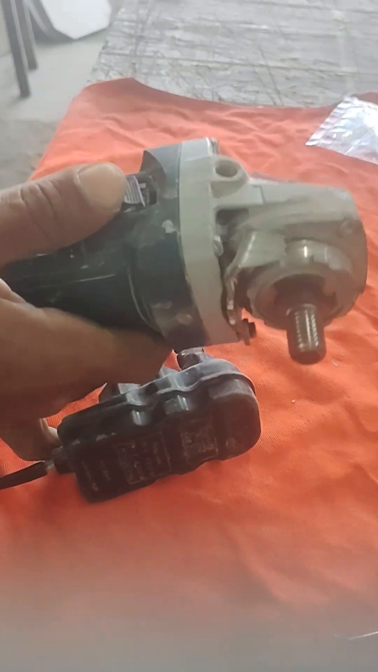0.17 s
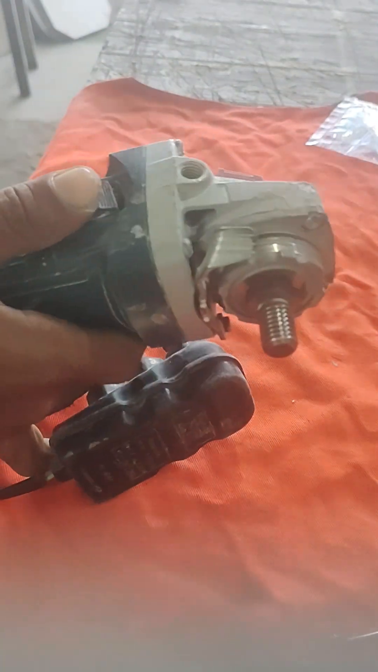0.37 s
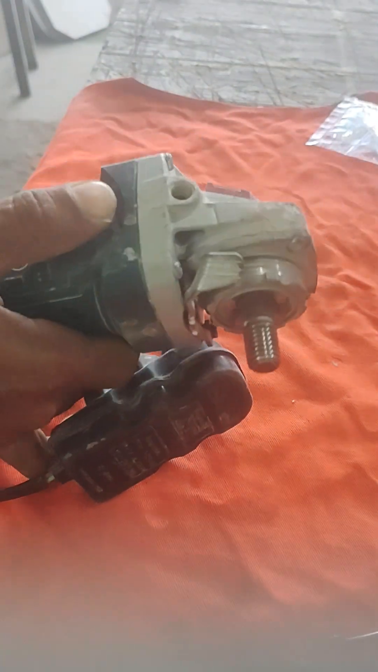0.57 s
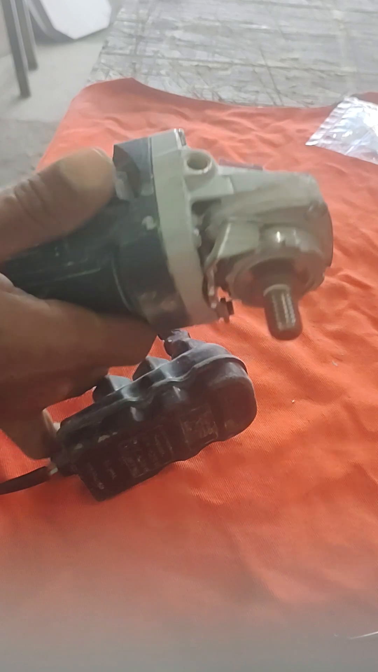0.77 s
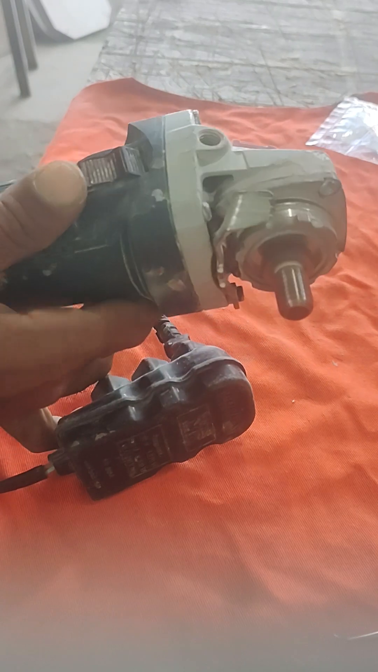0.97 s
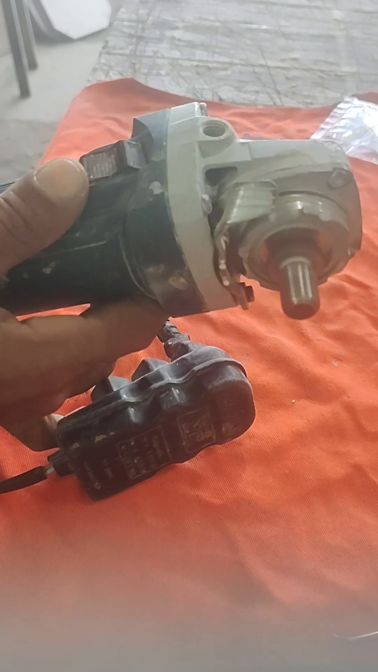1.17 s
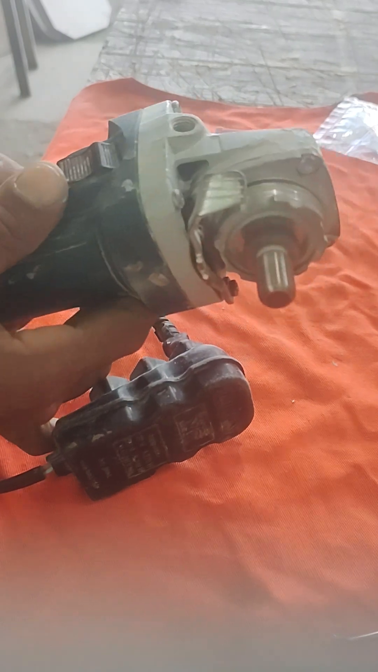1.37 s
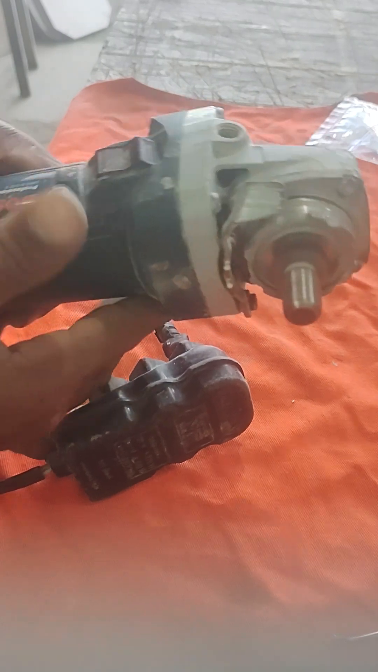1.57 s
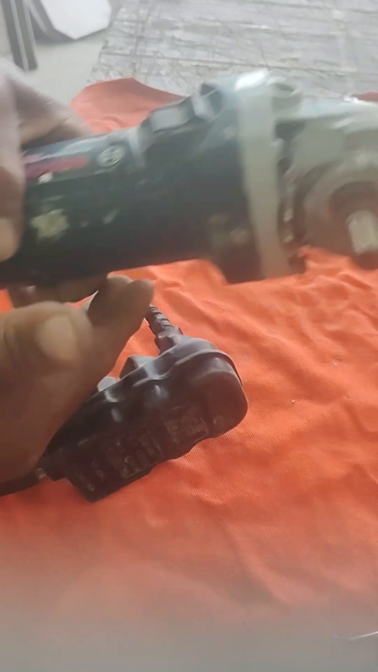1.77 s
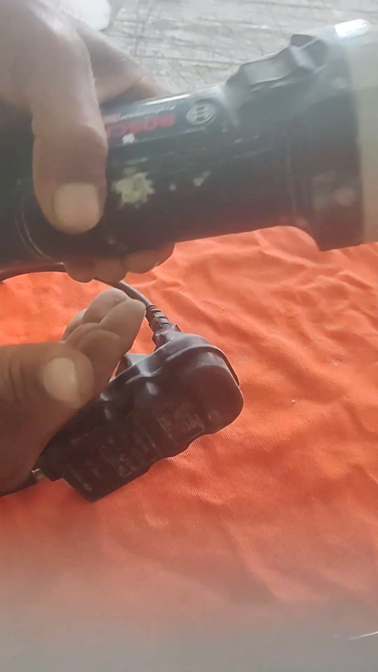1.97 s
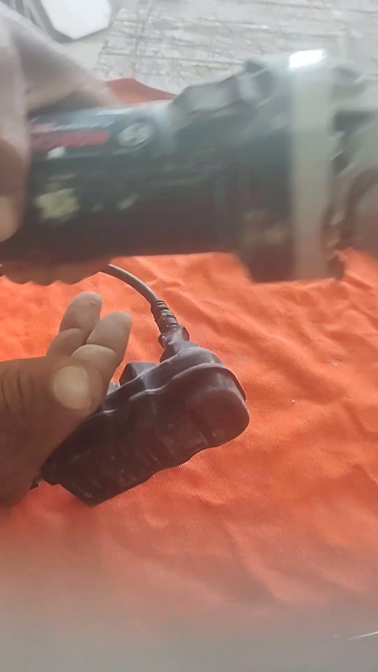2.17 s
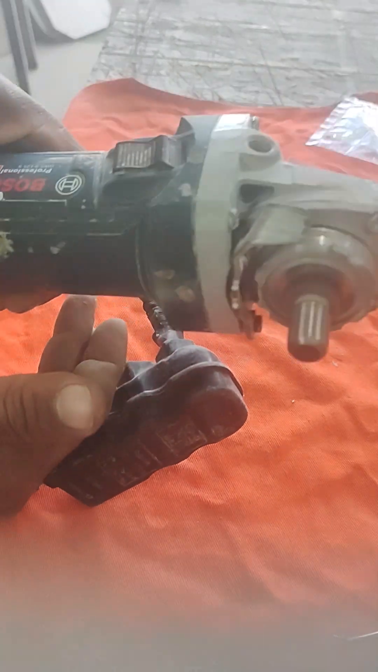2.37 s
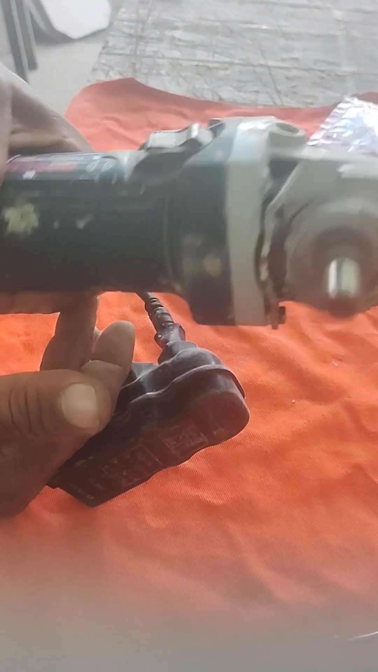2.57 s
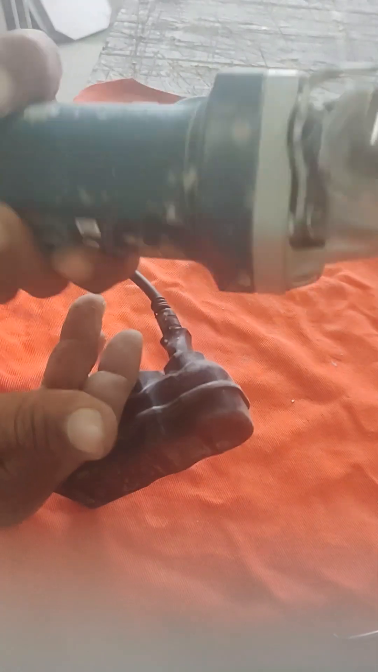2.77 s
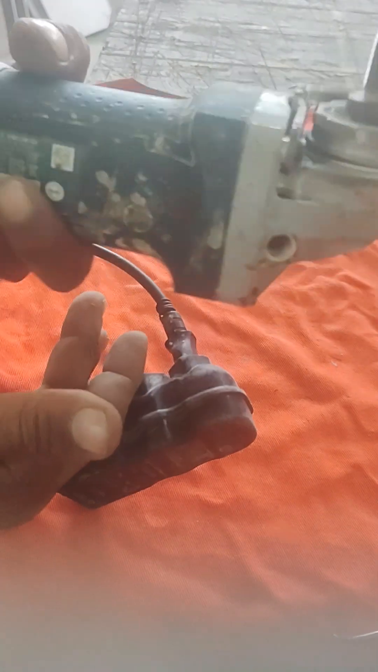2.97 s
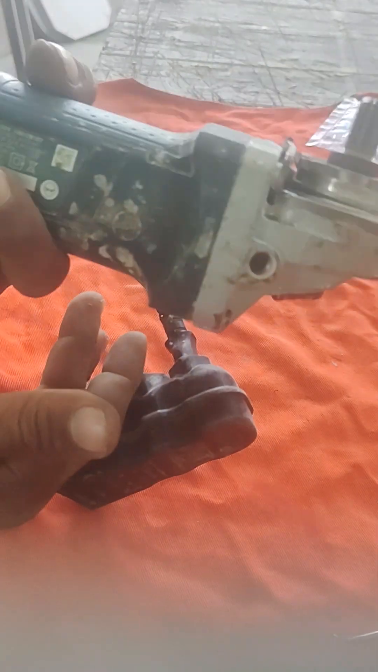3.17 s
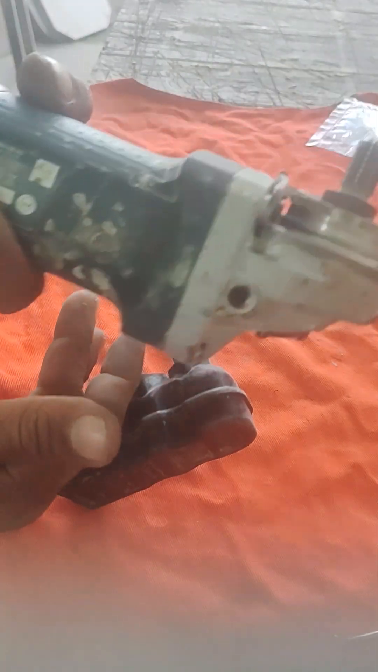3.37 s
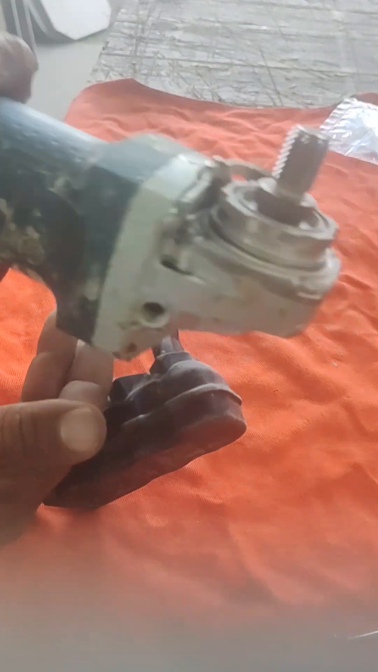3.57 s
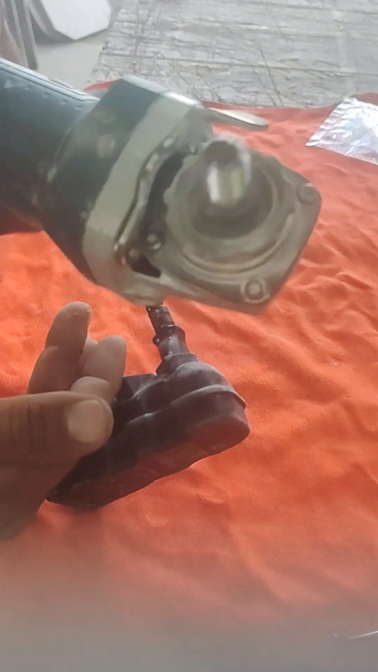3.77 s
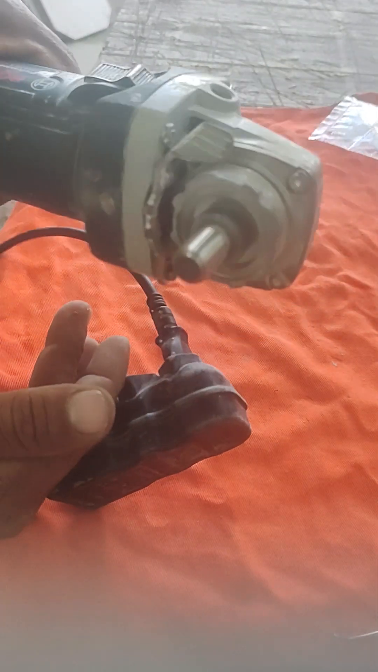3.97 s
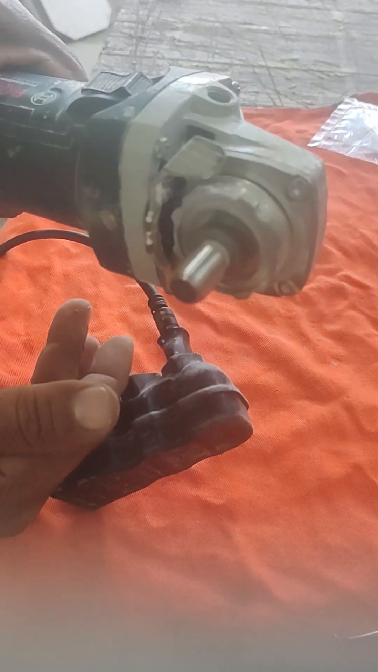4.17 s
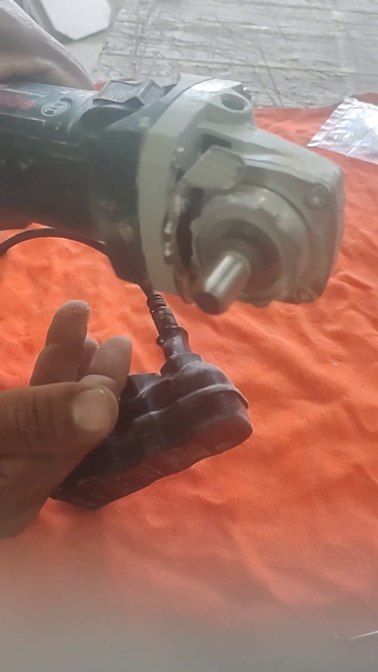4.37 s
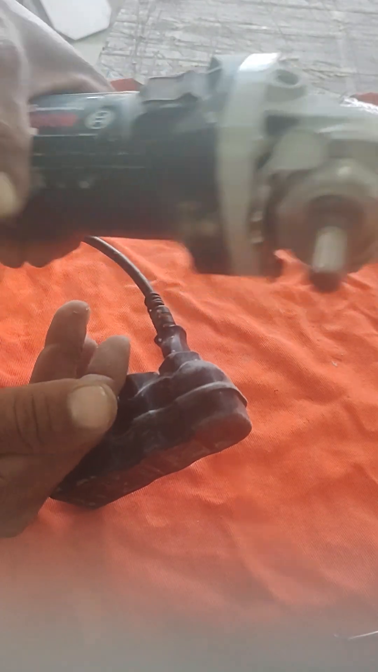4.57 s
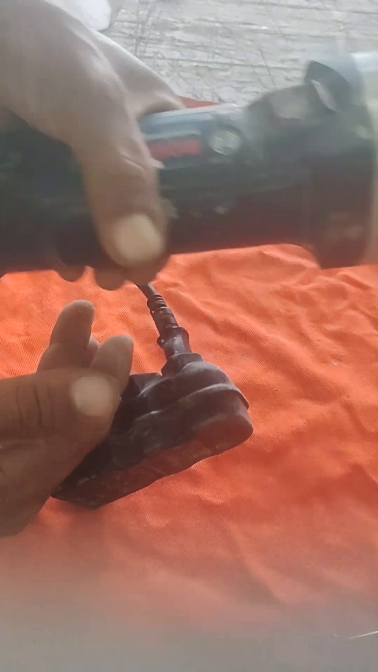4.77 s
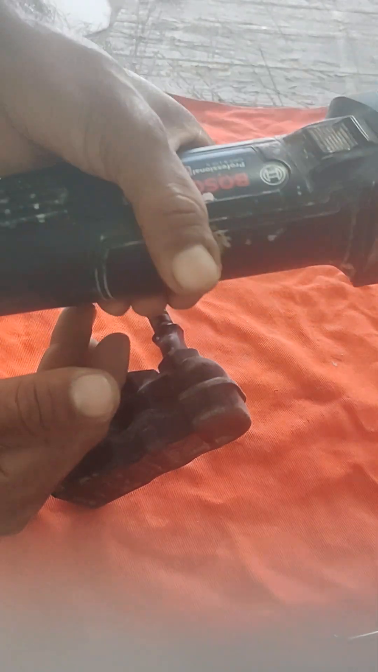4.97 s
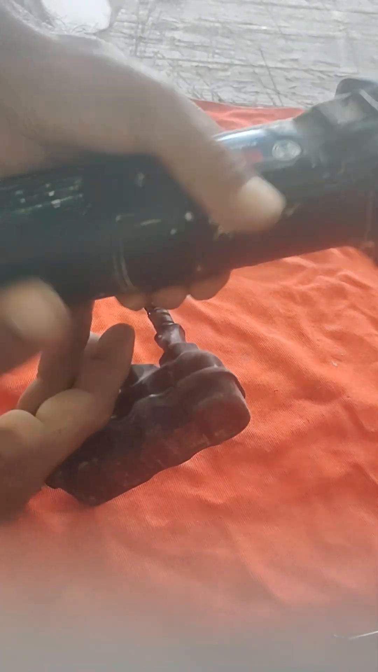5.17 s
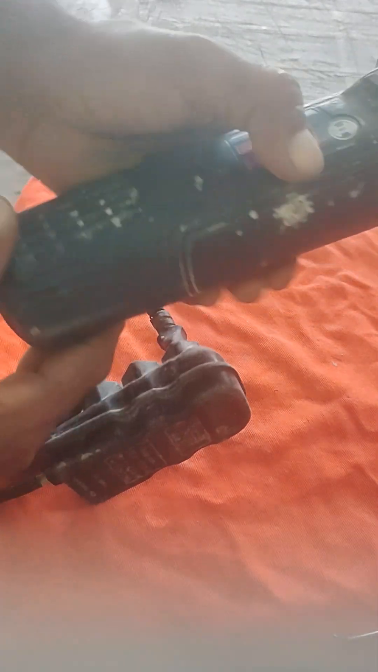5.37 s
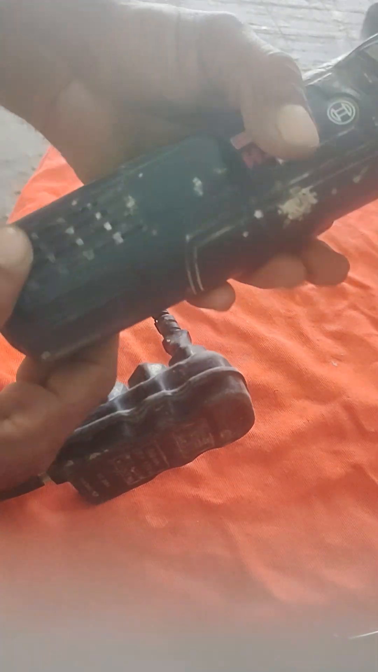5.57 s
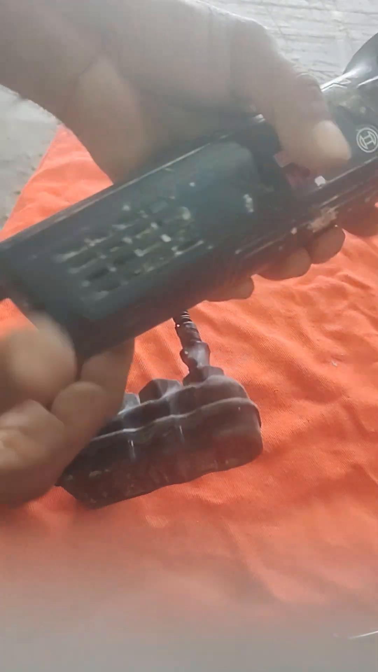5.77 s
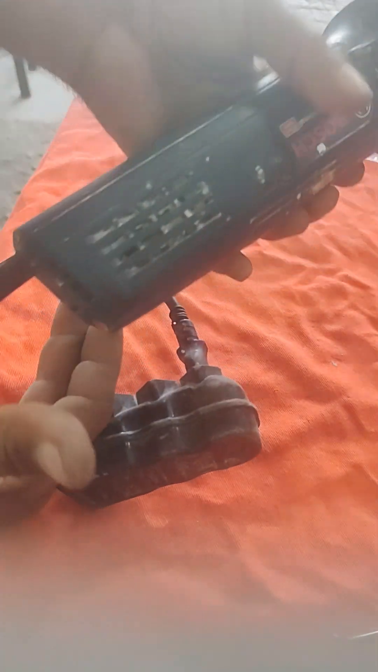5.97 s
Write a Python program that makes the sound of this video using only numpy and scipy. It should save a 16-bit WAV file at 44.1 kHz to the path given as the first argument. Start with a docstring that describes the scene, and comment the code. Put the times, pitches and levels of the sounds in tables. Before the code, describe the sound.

For the first half second there is only low, quiet workshop room tone with a very faint hiss. At about 0.57 s a slide switch gives a soft double click, and around 0.75-0.8 s a harder metallic knock comes as the gears take up slack. The grinder's motor starts at 0.7 s and sweeps up steeply, a rough growl throbbing with mains pulses and rising into a scream, near full speed by about 1.2 s. From then to 6 s it runs continuously: dense gritty gear rattle in a hard housing, low rotor hum, thin fluttering very high fan whine and bright rushing air. Pitch sags slightly around 1.5-2.5 s, then wanders gently. As the tool is turned, the whine and rattle swell and dip; rougher mid-high tones rise around 3.2-3.8, 4.9-5.5 and after 5.7 s, with hollower vent air near the end. Close, stereo, unloaded, still running when cut off.

```python
"""At a workshop table, an angle grinder with no disc is switched on close to a phone.
Over quiet room noise the slide switch clicks; the rotor then runs up to about 25000 turns a minute.
Loose gears rattle the housing (random blows into resonances), throbbing with the mains pulses.
The rotor hums and the fan whines (sine tones that follow its angle), and air rushes (shaped noise).
The sound shifts as the hand turns the tool: set curves and random patches move its levels."""
import sys
import numpy as np
from scipy import signal
from scipy.fft import rfft, irfft, next_fast_len
from scipy.io import wavfile
from scipy.ndimage import uniform_filter1d, map_coordinates

SR = 44100
rng = np.random.default_rng(int(sys.argv[2]) if len(sys.argv) > 2 else 0)


def waveform_to_disk(signal):
    """Save audio, clipped to [-1, 1], as 16-bit WAV at the path in sys.argv[1]."""
    frames = np.transpose(np.atleast_2d(signal))
    scaled = np.clip(frames, -1, 1) * 32767
    samples = np.round(scaled).astype(np.int16)
    wavfile.write(sys.argv[1], SR, samples)


N = 265041

# slide switch, then the first knocks of the gears taking up their slack; the level is before a 4.5 dB cut:
# (time [s], level [dB], bright snap relative to the knock [dB])
CLICKS = [(.567, -39, -5), (.588, -40, -7), (.753, -33, -40), (.802, -19, -36)]
START_S = 0.7  # the rotor starts to turn (s)
LEAD_S = 0.00037  # sound reaches the nearer, left microphone this much sooner (s)


def amp(db):
    """Turn decibels into a plain multiplier."""
    return 10 ** (np.asarray(db) / 20)


def unit(x):
    """Scale a signal to an rms (average strength) of 1."""
    return x / np.sqrt(np.mean(x ** 2) + 1e-20)


def along(points, hz):
    """Read a curve of (frequency [Hz], value) points, joined up on a log frequency axis."""
    f, v = np.transpose(points)
    return np.interp(np.log(hz + 1), np.log(f + 1), v)


def curves(rows):
    """Join up the rows over time: one value per sample for each column after the time."""
    times, *columns = np.transpose(rows)
    return [np.interp(np.arange(N) / SR, times, column) for column in columns]


def wobble(rate):
    """A smooth random curve through 'rate' random points a second."""
    points = rng.standard_normal(int(N * rate / SR) + 4)
    return map_coordinates(points, [np.arange(N) * rate / SR])


def two_wobbles(rate):
    """A separate random curve for left and right."""
    return np.array([wobble(rate), wobble(rate)])


def filtered(x, response):
    """Shape a sound by multiplying its spectrum by a response of frequency."""
    m = next_fast_len(N + SR // 4)
    return irfft(rfft(x, m) * response(np.fft.rfftfreq(m, 1 / SR)), m)[..., :N]


def resonances(modes, hz):
    """Response of (frequency [Hz], width [Hz], level [dB]) resonances to a blow, with alternating signs."""
    total = 0
    for k, (centre, width, db) in enumerate(modes):
        ring = 1j * hz * width / (centre * centre - hz * hz + 1j * hz * width)
        total = total + (-1) ** k * amp(db) * ring
    return total


def housing(hz):
    """The tool's housing rings at its own pitches when struck."""
    # resonances of the housing: (frequency [Hz], width [Hz], level [dB])
    housing_modes = [(618, 13.4, -12), (935, 162, -12), (1334, 233, -8.5), (1924, 640, -10),
                     (2536, 334, -1.5), (2935, 210, 0), (3390, 260, -9), (3900, 330, -14), (4580, 140, -15),
                     (5860, 190, -18.5), (7650, 300, -37)]
    return resonances(housing_modes, hz)


def spread(pair, response):
    """Blend two unrelated signals into a coloured left and right, as two microphones hear it, of rms 1."""
    # how alike the two microphones sound: (frequency [Hz], likeness [0-1, below 0 counts as 0])
    alike = [(50, 0.8), (130, 1), (400, 0.9), (580, -0.5), (800, 0.86), (1300, 0.58), (1900, 0.76),
             (2800, 0.45), (3600, 0.24), (6000, -0.19), (7500, 0.14), (11000, 0.13)]
    # how much louder the left one is: (frequency [Hz], left minus right [dB])
    balance = [(100, 0), (800, 1.5), (1200, -4), (1450, 5.5), (1850, -3.5), (2800, 0.5), (4200, -1),
               (5800, -5), (7300, -2.5), (8500, 2.5), (11000, 1.5), (13000, 2), (15000, 4.5)]

    def mid_side(hz):
        turn = np.arccos(np.clip(along(alike, hz), 0, 1)) / 2  # less alike = more side
        return response(hz) * np.array([np.cos(turn), np.sin(turn)])

    def left_right(hz):
        tilt = amp(along(balance, hz) / 2) * np.exp(1j * np.pi * hz * LEAD_S)
        return np.array([tilt, 1 / tilt])

    mid, side = filtered(pair, mid_side)
    return unit(filtered(np.array([mid + side, mid - side]), left_right))


def rush(spectrum, hollow=0, spacing_hz=578, fade_hz=2400):
    """Stereo noise of rms 1; a close echo can hollow out evenly spaced bands of its low end."""
    def colour(hz):
        echo = hollow * np.exp(-(hz / fade_hz) ** 2 - 2j * np.pi * hz / spacing_hz)
        return amp(along(spectrum, hz)) * (1 - echo * (hz > spacing_hz / 2))

    return spread(rng.standard_normal((2, N)), colour)


def patchy(x, depth_db, strands_db=2.0):
    """Turning the tool beams parts of its sound to and fro: random broad patches and narrow strands."""
    z = signal.stft(x, nperseg=2048)[2]

    def field(size):
        noise = rng.standard_normal(z.shape[1:])
        across_pitch = uniform_filter1d(noise, size, axis=0)
        return unit(uniform_filter1d(across_pitch, size=14, axis=1))

    gain = amp(depth_db * field(size=20) + strands_db * field(size=3))
    return signal.istft(z * gain, nperseg=2048)[1][:, :N]


def swept(peaks, pitch):
    """Gain of a tone as its pitch sweeps through (frequency [Hz], width [Hz], level [dB]) peaks."""
    return sum(amp(db) / (1 + (2 * (pitch - hz) / width) ** 2) for hz, width, db in peaks)


def workshop(ring_hz=5320, width_hz=170):
    """Low room noise, with a faint, narrow hiss that comes and goes."""
    # quiet workshop: (frequency [Hz], relative level [dB per Hz])
    room_tone = [(15, -52), (25, -30), (43, -15), (64, -7), (86, -13), (495, -16), (598, -18), (1170, -25),
                 (2560, -26.5), (4040, -29), (5430, -25.5), (6550, -30), (15500, -46)]
    ring = spread(rng.standard_normal((2, N)), lambda hz: np.exp(-((hz - ring_hz) / width_hz) ** 2))
    # (time [s], level [dB])
    ring_db, = curves([(0, -68), (.18, -80), (.36, -69), (.55, -72), (.7, -70)])
    return amp(-67) * rush(room_tone) + amp(ring_db) * ring


def handling():
    """Clicks ring the housing, with a bright snap and a short room tail; the hand gives one dull bump."""
    # the hand bumps the tool: (time [s], level [dB])
    bump_s, bump_db = (3.745, -41)
    t = np.arange(N) / SR

    def fade(start, t60):
        """A sudden start that falls by 60 dB in t60 seconds."""
        return (t >= start) * amp(-60 * np.abs(t - start) / t60)

    knock_level, snap_level = np.zeros(N), np.zeros(N)
    for start, db, snap_db in CLICKS:
        blow = amp(db - 4.5) * (fade(start, 0.023) + 0.3 * fade(start, 0.14))  # knock and room tail
        knock_level += blow
        snap_level += amp(snap_db) * blow
    knocks = knock_level * spread(rng.standard_normal((2, N)), housing)
    snaps = snap_level * rush([(200, 4), (800, 9), (1500, -7), (8000, 3), (15000, -9)])
    dull = rush([(25, -14), (70, -2), (150, 0), (400, -30), (2000, -80)])
    return knocks + snaps + amp(bump_db) * fade(bump_s, 0.082) * dull


def stir():
    """The gears tremble faintly after the first click, growing until the rotor starts, then holding level."""
    stir_db, growth_db_per_s = -36, 128  # level reached, under full running (dB); rise (dB per s)
    t = np.arange(N) / SR
    return (t > CLICKS[0][0]) * amp(stir_db - growth_db_per_s * np.maximum(START_S - t, 0))


def motor():
    """Share of running speed reached; current rushes in at the start and falls as the rotor speeds up."""
    run_up_s, ease = 0.296, 1.5  # time to gather speed (s); how gently it begins (1 = at once)
    inrush_s = 0.1  # time to full inrush (s)
    current_fall, free_current = 6.4, 0.12  # power of the speed; share left when running free
    since = np.maximum(np.arange(N) / SR - START_S, 0)
    spin = np.tanh((since / run_up_s) ** ease)
    inrush = np.minimum(since / inrush_s, 1) ** 2
    current = inrush * (1 - (1 - free_current) * spin ** current_fall)
    return spin, current


def mains():
    """Torque peaks twice in each mains cycle, so 120 times a second."""
    return np.cos(2 * np.pi * 120 * (np.arange(N) / SR - .803))


def gears(angle, speed, current, rear, level, scatter_db=2.5, scrape=0.68):
    """Loose teeth strike with random force, hardest at the torque peaks, and ring housing and gear head."""
    # hollow of the gear head: (frequency [Hz], width [Hz], level [dB])
    head_modes = [(1319, 74, 6), (1439, 170, 3), (3456, 150, 0.5), (3735, 116, 1.5)]
    # pitches at which the gear whine swells in the run-up: (frequency [Hz], width [Hz], level [dB])
    mesh_peaks = [(3320, 300, -17.5), (4200, 800, -14.5)]
    teeth, throb = 12, 0.8  # strikes per turn; depth of the mains throb at full current
    hits = np.flatnonzero(np.diff(np.floor(teeth * angle)))
    slack = rng.random(len(hits)) * SR / 3000  # each strike is late by up to 1/3000 s
    sizes = rng.standard_normal((2, len(hits))) * amp(scatter_db * rng.standard_normal(len(hits)))
    blows = np.zeros((2, N))
    blows[:, np.minimum(hits + slack.astype(int), N - 1)] = sizes
    scraping = scrape * rng.standard_normal((2, N))
    force = (unit(blows) + scraping) * (1 + throb * current * mains())
    pace = speed / speed.max()
    rattle = patchy(spread(force, housing), depth_db=0.1)
    # the gear head is heard less when the rear vents face the microphones
    head_level = amp(-3.5) * (1 - 0.93 * rear) * pace
    head = head_level * spread(force, lambda hz: resonances(head_modes, hz))
    # slow teeth grind with a duller sound
    dull = spread(force, lambda hz: resonances([(956, 750, 0)], hz) ** 2)
    grind = amp(-0.4) * (1 - pace) * dull
    # under load the teeth stay in contact and sing, roughly
    mesh = np.sin(2 * np.pi * teeth * angle + 1.8 * two_wobbles(400))
    song = current * swept(mesh_peaks, teeth * speed) * amp(5.5 * mains()) * mesh
    return level * (rattle + head + grind) + song


def rotor(angle, speed, spin, current):
    """Unbalance hum and bearing tones grow steeply with speed; mains hum follows the current."""
    # once-a-turn hum of the unbalance at full speed: (time [s], rms level [dB])
    unbalance = [(1.15, -31.5), (1.77, -41), (2.15, -37.5), (2.76, -38.5), (2.85, -55), (2.97, -39.5),
                 (3.19, -46.5), (3.93, -41.5), (3.97, -37), (4.51, -40.5), (5.08, -32.5), (5.47, -32.5),
                 (5.55, -38), (6.0, -32)]
    # tones of rotor and bearings at full speed, before random fading: (multiple of the speed, level [dB])
    orders = [(3, -32), (6, -54), (7, -31), (8, -27), (9, -25), (10, -45), (11, -36.5), (12, -41),
              (21, -47), (22, -46), (24, -57)]
    # a tone swells while the tool's angle beams it at the microphones; level at full speed:
    # (start [s], end [s], multiple of the speed, level [dB])
    swells = [(1, 2.1, 3, -31), (2.5, 3.3, 9, -25), (3.15, 3.753, 9, -17.5), (3.25, 3.8, 8, -23),
              (4.85, 5.45, 9, -18.5), (4.9, 5.55, 8, -25), (5.65, 6.2, 10, -18.5), (5.65, 6.2, 8, -35)]
    heard = angle + LEAD_S * speed * np.array([[1], [0]])  # the left microphone hears it sooner
    hum_level = np.sqrt(2) * amp(curves(unbalance)[0]) * spin ** 5.5
    hum = hum_level * np.sin(2 * np.pi * heard)
    tones = np.zeros((2, N))
    for order, db in orders:
        fading = wobble(6.5) + 1j * wobble(6.6) + .5 * two_wobbles(70)
        tones += amp(db) * np.real(fading * np.exp(2j * np.pi * order * heard))
    for start, end, order, db in swells:
        arch = np.sin(np.pi * curves([(start, 0), (end, 1)])[0])
        waver = 1.9 * two_wobbles(45)
        tone = np.sin(2 * np.pi * round(order) * heard + waver)
        tones += amp(db) * arch * (1 + 0.14 * wobble(60)) * tone
    mains_hum = amp(-57.5) * current * mains()
    return hum + tones * (speed / speed.max()) ** 7 + mains_hum


def fan(angle, speed, spin, current):
    """The blades chop the air into a thin, fluttering whine that grows with a power of the speed."""
    # blade tone as the tool is turned, before fading, flutter and growth: (time [s], left [dB], right [dB])
    whine = [(1.0, -19.5, -27), (1.4, -25, -23.5), (1.46, -27, -31), (1.8, -18.5, -19), (2.0, -23, -29),
             (2.1, -23.5, -21.5), (2.42, -21.5, -26), (2.46, -27, -25), (2.78, -18, -19.5),
             (2.88, -28, -28), (3.0, -18, -19.5), (3.28, -26, -24), (3.36, -16.5, -30),
             (3.86, -21.5, -21.5), (3.96, -22.5, -28), (4.3, -24.5, -19.5), (5.0, -22, -27),
             (5.24, -25.5, -24), (5.42, -22, -21.5), (5.76, -20, -28.5), (5.82, -26, -31), (6.0, -23, -21)]
    # how much later the tone reaches the left microphone: (time [s], lag [cycles])
    whine_lag = [(1.2, 0.13), (1.4, 0.39), (1.85, 0.038), (2.5, 0.34), (3.05, 0.17), (3.7, 0.52),
                 (4.05, 0.47), (4.35, 0.045), (4.8, 0.088), (5.35, 0.38), (6, 0.23)]
    # pitch at which the run-up boosts the tone: (frequency [Hz], width [Hz], added gain [dB])
    whine_peak = [(8370, 800, 10)]
    blades = 23
    lag, = curves(whine_lag)
    fade_db = 2.8 * two_wobbles(14)
    flutter_db = 1.2 * two_wobbles(110) + 1.7 * wobble(28) + 3 * current * mains()
    drift = 0.5 * two_wobbles(7) + 0.15 * wobble(75)
    growth = spin ** 3.3 * (1 + swept(whine_peak, blades * speed))
    level = amp(np.array(curves(whine)) + fade_db + flutter_db) * growth
    cycles = blades * angle - lag * np.array([[1], [0]])
    return level * np.sin(2 * np.pi * cycles + drift)


def airflow(spin, rear, loudness):
    """Air rushes through the vents and their ducts, louder and brighter with speed."""
    # air through the fan: (frequency [Hz], relative level [dB per Hz])
    air_spectrum = [(25, -54), (60, -33), (120, -29), (220, -20.5), (350, -15.5), (520, -9.5), (1150, -6.5),
                    (1700, -0.5), (2200, -4), (4000, 1), (6000, 0), (7200, -4.5), (9000, -7.5),
                    (12000, -13.5)]
    # hiss at the vents: (frequency [Hz], relative level [dB per Hz])
    hiss_spectrum = [(3000, -53), (8000, 2.5), (10500, -6), (13000, 1), (15800, 0)]
    # ducts of the rear vents: (frequency [Hz], width [Hz], level [dB])
    duct_modes = [(887, 180, -6.5), (1950, 320, -3), (2155, 130, -3), (3230, 180, -4.5), (3800, 130, -1.5),
                  (3990, 140, -4)]
    # level at full speed (dB over the loudness), and the power of the speed with which each grows
    air_db, air_grows = 1, 1.98
    hiss_db, hiss_grows = -6.5, 3.3
    flow = loudness * amp(air_db) * spin ** air_grows
    hiss = loudness * amp(hiss_db) * spin ** hiss_grows
    air = patchy(flow * rush(air_spectrum, hollow=0.22) + hiss * rush(hiss_spectrum), depth_db=1.08)
    ringing = spread(rng.standard_normal((2, N)), lambda hz: resonances(duct_modes, hz))
    return air + amp(-1.4) * flow * rear ** 2 * ringing


def scene():
    """Motor speed and current drive gears, rotor, fan and air; the hand sets their loudness and direction."""
    # speed at which the motor settles; it sags and wanders a little: (time [s], speed [turns per s])
    settled_speed = [(1.38, 443.6), (1.52, 442.0), (1.82, 430.1), (2.0, 425.4), (2.46, 419.7),
                     (2.88, 424.8), (3.12, 424.8), (3.36, 418.6), (3.84, 416.1), (4.08, 416.8),
                     (4.28, 425.0), (4.86, 423.0), (5.0, 420.1), (5.24, 422.2), (5.76, 415.0), (6.0, 418.8)]
    # how far the rear vents face the microphones instead of the gear head: (time [s], share [0-1])
    rear_share = [(1, 0.74), (1.6, .05), (2.05, 0.6), (2.5, 0.38), (4.1, 0.11), (4.6, 0.28), (5, 0.56),
                  (5.45, 0.66), (5.75, 0.78), (6, 0.74)]
    # loudness of gear rattle and air as the hand moves the tool: (time [s], level [dB])
    hand_loudness = [(1.1, -16), (1.17, -15.5), (1.8, -17), (2.01, -15.5), (2.18, -17.5), (2.27, -15.5),
                     (2.63, -17.5), (2.67, -15.5), (3.11, -16.5), (3.15, -19), (3.41, -15.5), (4.4, -16.5),
                     (4.44, -19), (4.54, -16), (4.88, -16.5), (5.02, -15), (5.26, -16.5), (6.0, -17)]
    gear_db, load_db = -4.5, 4  # rattle over the loudness (dB); extra under full inrush torque (dB)
    spin, current = motor()
    speed = spin * curves(settled_speed)[0]
    angle = np.cumsum(speed * (1 + .0004 * wobble(40))) / SR  # in turns, slightly uneven
    rear, = curves(rear_share)
    loudness = amp(curves(hand_loudness)[0])
    gear_level = loudness * amp(gear_db + load_db * current) * (spin + stir())
    tool = gears(angle, speed, current, rear, gear_level) + rotor(angle, speed, spin, current)
    tool += fan(angle, speed, spin, current) + airflow(spin, rear, loudness)
    return workshop() + handling() + tool


def record(dry):
    """The phone keeps nothing above its band limit, reached by a short slope."""
    top_hz, slope_hz = 15850, 150  # middle and width of the slope (Hz)
    return filtered(dry, lambda hz: np.clip((top_hz - hz) / slope_hz + .5, 0, 1) ** 2)


dry = scene()
out = record(dry)
waveform_to_disk(out)
```